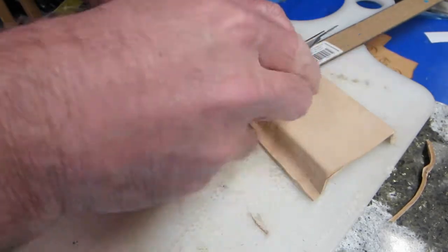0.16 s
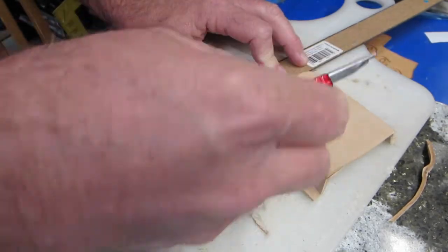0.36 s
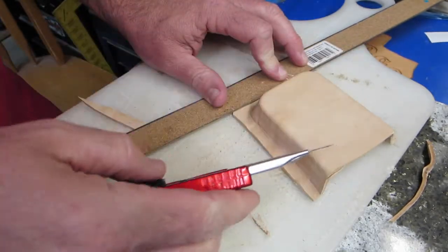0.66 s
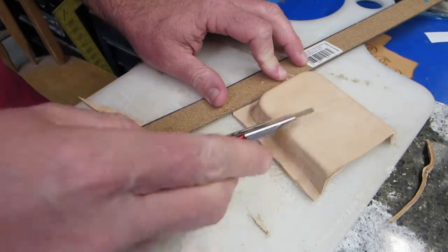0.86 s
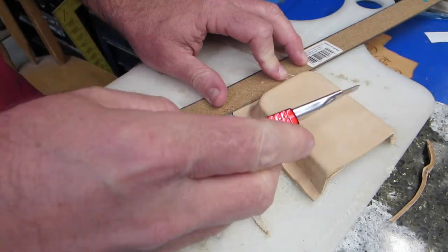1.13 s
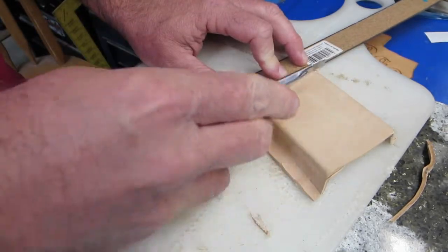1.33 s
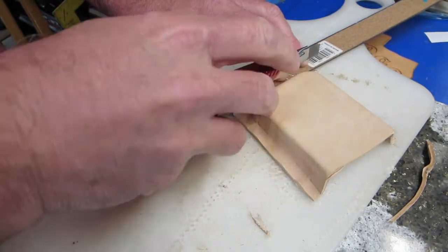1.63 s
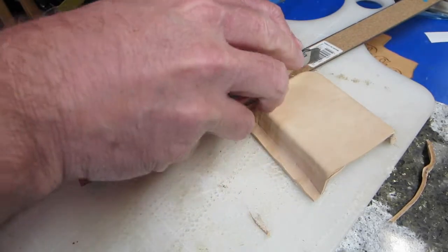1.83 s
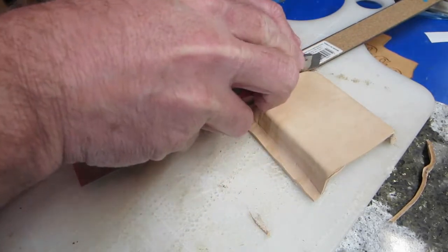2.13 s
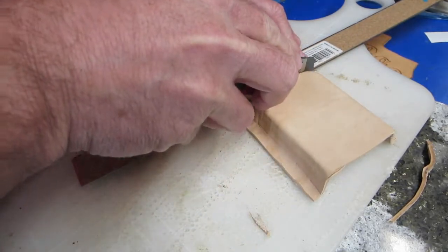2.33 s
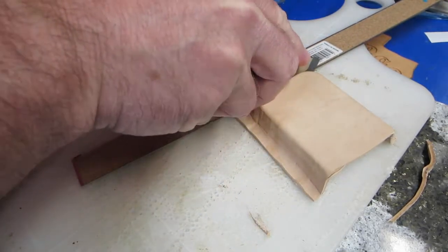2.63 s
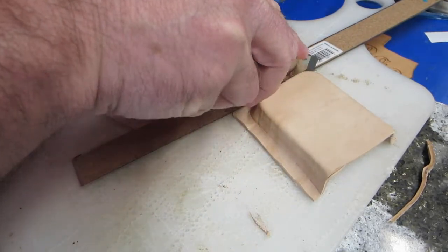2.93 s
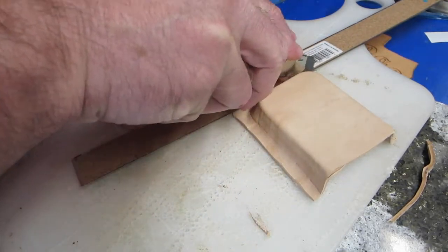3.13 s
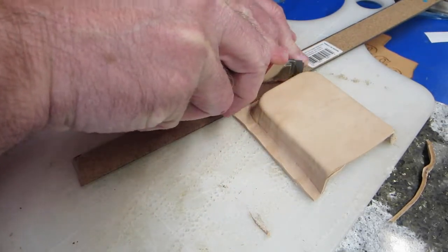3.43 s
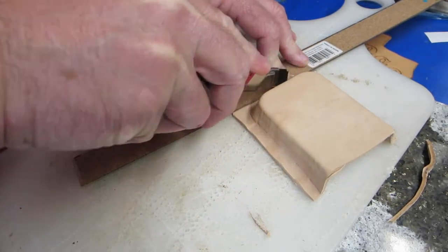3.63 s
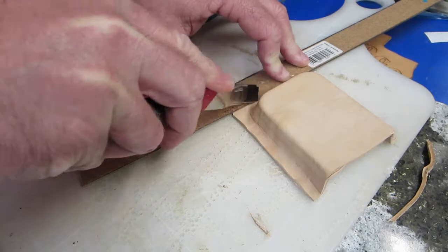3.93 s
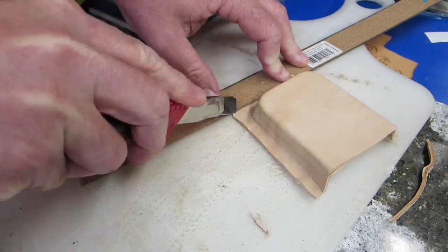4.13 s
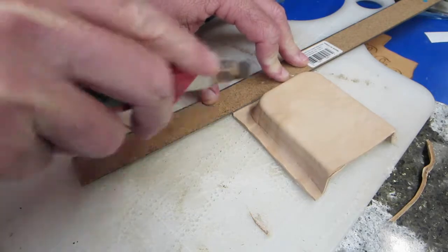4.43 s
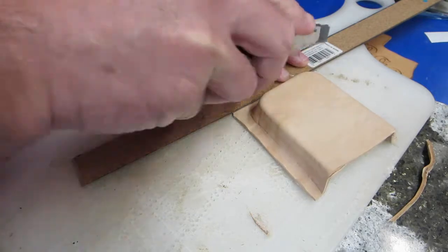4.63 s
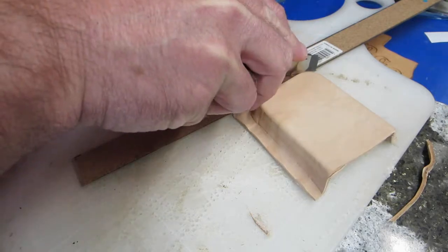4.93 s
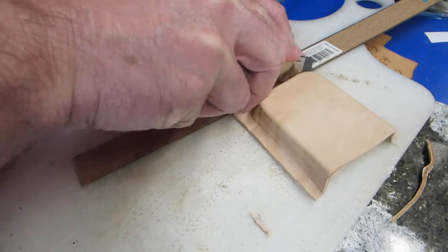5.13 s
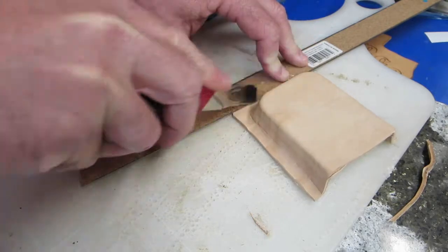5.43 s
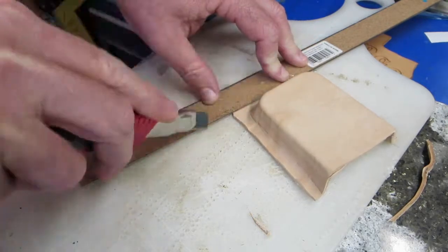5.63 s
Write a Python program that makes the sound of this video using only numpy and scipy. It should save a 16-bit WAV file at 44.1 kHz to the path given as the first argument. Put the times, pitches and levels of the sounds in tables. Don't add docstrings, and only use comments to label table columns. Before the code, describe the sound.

A low motor hum near 58 Hz beats slowly, about twice a second, over soft ventilation rumble; a very faint distant whine falls in pitch from 0.5 s. Close to the microphone, fingers lightly brush leather at 0.1 and 0.8 s, with a small double tick at 0.56 s. From 1.95 to 2.6 s come dull board knocks, soft hand thuds and bright steel ticks, then tiny touches. At 3.3 s the first cut begins: scratchy, grainy stick-slip rasp with airy blade hiss, fluctuating and growing until 4.2 s. A hard, loud clack and bench thud hit at 4.26 s, followed by scattered metallic ticks, with a sharper one at 4.84 s. The second cut starts about 5.13 s, swelling fast to a much louder, coarse rip with knocks, stopping near 5.56 s. Low thuds and a last click at 5.69 s leave the hum. Short, dry room.

```python
import sys
import numpy as np
from scipy import signal
from scipy.fft import rfft, irfft, next_fast_len
from scipy.io import wavfile
from scipy.ndimage import uniform_filter1d

SR = 44100
rng = np.random.default_rng(int(sys.argv[2]) if len(sys.argv) > 2 else 0)


def master(y):
    cut = np.clip(np.atleast_2d(y).T, -1, 1)
    pcm = np.round(cut * 32767)
    wavfile.write(sys.argv[1], SR, pcm.astype(np.int16))


def rack_gain(trim_db):
    fader = np.asarray(trim_db, float)
    return 10 ** (fader / 20)


N = 254016
MEDIUM_DRAG_DB = -40
RISE_S = 0.00066


def rms_one(x):
    return x / np.sqrt(np.mean(x ** 2) + 1e-20)


def in_time(rows):
    s, *columns = np.transpose(rows)
    return [np.interp(np.arange(N) / SR, s, c) for c in columns]


def at_hz(points, hz):
    points_hz, values = np.array(points)[:, :2].T
    return np.interp(np.log(hz), np.log(points_hz), values)


def filtered(x, order, hz, kind):
    return signal.sosfilt(signal.butter(order, hz, kind, fs=SR, output="sos"), x)


def drift(rate):
    r = np.exp(-40 * np.pi * rate / SR)
    white = rng.standard_normal(N // 20 + 2002)
    slow = signal.lfilter([1], [1, -2 * r, r * r], white)[2000:]
    return np.interp(np.arange(N) / 20, np.arange(len(slow)), rms_one(slow))


def ring(clicks, hz, t60):
    r, w = rack_gain(-60 / (t60 * SR)), 2 * np.pi * hz / SR
    return signal.lfilter([0, np.sin(w)], [1, -2 * r * np.cos(w), r * r], clicks + 1e-18)


def body(x, peaks, patchy_db, patch_rate, fill):
    modes = 0
    for k, (hz, width_hz, level_db) in enumerate(peaks):
        r = np.exp(-np.pi * width_hz / SR)
        top = (1 - r * r) / 2 * rack_gain(level_db) * (-1) ** k
        mode = signal.lfilter([top, 0, -top], [1, -2 * r * np.cos(2 * np.pi * hz / SR), r * r], x)
        modes = modes + mode * rack_gain(patchy_db * drift(patch_rate))
    low_hz, high_hz, fill_db = fill
    broad = filtered(x[:, ::-1], 2, [low_hz, high_hz], "band")
    return rms_one(rms_one(modes) + rack_gain(fill_db) * rms_one(broad))


def spread(mid, side, alike):
    alike = np.clip(alike, -1, 1)
    return (np.sqrt(1 + alike) * mid + np.sqrt(1 - alike) * side * np.array([[1], [-1]])) / np.sqrt(2)


def air():
    # (frequency [Hz], density [dB per Hz])
    air_spectrum = [(25, -25), (45, -4.5), (80, 7.5), (180, -2.5), (300, -2.5), (1300, -17.5),
                    (4500, -31.5), (16000, -38)]
    # (frequency [Hz], left-right likeness [1])
    likeness = [(60, 1.0), (150, 1), (380, 0.39), (950, 0.092), (2380, 0.31), (5980, 0.034), (15000, 0.031)]
    # (time [s], frequency [Hz], level [dB])
    whine_track = [
        (0, 1000, -93),
        (.5, 919, -62),
        (1.2, 847, -64),
        (1.8, 782, -69.5),
        (2.5, 766, -66),
    ]
    rumble, edges_hz = 0, np.geomspace(28, 16500, num=23)
    white = rng.standard_normal((2, 2, N))
    for k, (low_hz, high_hz) in enumerate(zip(edges_hz, edges_hz[1:])):
        pair = filtered(white[k % 2], 2, [low_hz, high_hz], "band")
        hz = np.sqrt(low_hz * high_hz)
        gain = rack_gain(at_hz(air_spectrum, hz) + 0.6 * drift(4.64))
        rumble = rumble + gain * spread(*pair, at_hz(likeness, hz))
    hz, level_db = in_time(whine_track)
    turn = 2 * np.pi * np.cumsum(hz) / SR
    whine = drift(25) * np.cos(turn) + drift(25) * np.sin(turn)
    whine = whine + 1.3 * drift(40) * np.cos(.8 * turn)
    return rack_gain(-49) * rms_one(rumble) + rack_gain(level_db) * whine


def motors():
    # (frequency [Hz], time of a wave crest [s])
    hum_waves = [(57.345, .0049), (59.237, .0036), (114.67, -.0014), (118.454, .0028), (119.99, -.0013),
                 (229.42, -.0007), (240, .0008)]
    # (peak level [dB], pan [dB])
    hum_levels = [(-41.5, 0), (-42.5, 0), (-58, 0), (-52, -0.5), (-50.5, 0), (-55, -0.5), (-60, -3)]
    # (frequency [Hz], rms level [dB])
    whistle = [(15735, -83)]
    t = np.arange(N) / SR
    out = sum(rack_gain(db + 3.5) * np.cos(2 * np.pi * hz * t) for hz, db in whistle)
    for (hz, crest_s), (level_db, pan_db) in zip(hum_waves, hum_levels):
        wave = rack_gain(level_db) * np.cos(2 * np.pi * hz * (t - crest_s))
        out = out + wave * rack_gain([[pan_db / 2], [-pan_db / 2]])
    return out


def shop(x):
    t60_s, wall_cut_hz = 0.21, 5700
    size = next_fast_len(N + SR)
    w = 2 * np.pi * np.arange(size // 2 + 1) / size
    dull = np.exp(-2 * np.pi * wall_cut_hz / SR)
    wall = (1 - dull) / (1 - dull * np.exp(-1j * w))
    sound, out = rfft(x, size), np.zeros((2, N))
    lags = (rng.uniform(0.0037, .025, (2, 6)) * SR).astype(int)
    for channel in range(2):
        response = 0
        for k, lag in enumerate(lags[channel]):
            loop = rack_gain(-60 * lag / SR / t60_s) * wall * np.exp(-1j * w * lag)
            response = response + (-1) ** k * loop / (1 - loop)
        out[channel] = irfft(sound * response, size)[:N]
    mid, side = out.mean(axis=0), (out[0] - out[1]) / 2
    side = filtered(side, 2, 1500, "high")
    return np.array([mid + side, mid - side])


def cuts():
    # (time [s], drag on the rule [dB], bite into the board [dB re drag])
    strokes = [
        [(3.3, -66, -1.5), (3.385, -48, -13), (3.463, -42.5, -3), (3.551, -43, -4.5), (3.653, -39.5, 1),
         (3.821, -41.5, -3.5), (3.981, -35.5, -5), (4.09, -34.5, -11), (4.19, -43, -3.5)],
        [(5.135, -53, -14), (5.193, -49.5, -6), (5.247, -44.5, -9), (5.313, -34, -0.5), (5.345, -33.5, 0),
         (5.398, -29, -1.5), (5.456, -23.5, -1.5), (5.504, -19, -3.5), (5.556, -26, -3.5)],
    ]
    t, out = np.arange(N) / SR, np.zeros((2, N))
    for rows in strokes:
        drag_db, bite_db = in_time(rows)
        after = t - rows[-1][0]
        drag_db = drag_db - (after > 0) * (9.5 + 279 * after)
        out += (t >= rows[0][0]) * rack_gain([drag_db, drag_db + bite_db])
    return out


def shifts():
    # (crest time [s], drag [dB], rise [s over 20 dB], fall [s over 20 dB], bite [dB re drag])
    creeps = [(0.01, -62, .1, 0.65, 2), (.8, -72.5, .3, 2.5, -2), (1.9, -62, .4, 0.2, 3),
              (2.27, -62, .18, 0.2, 1), (2.57, -52.5, .3, 0.08, -2.2), (2.95, -76.5, 1.1, 0.2, 4),
              (3.29, -63, .6, 0.5, 0.5), (4.262, -49, .002, 0.35, -7), (4.88, -57.5, .11, 0.22, 5),
              (5.599, -39.5, .2, 0.08, -0.3), (5.66, -56, .05, 4, -3.5)]
    t, out = np.arange(N) / SR, np.zeros((2, N))
    for s, drag_db, rise, fall, bite_db in creeps:
        swell_db = drag_db - 20 * np.maximum((s - t) / rise, (t - s) / fall)
        out += rack_gain(swell_db + np.array([[0], [bite_db]]))
    return out


def follow(gain, level_db, share):
    return rack_gain(level_db) * (gain / rack_gain(MEDIUM_DRAG_DB)) ** share


def bench():
    # (time [s], peak level [dB])
    hand_thuds = [(2.154, -42), (2.164, -32), (2.241, -35), (2.566, -37), (2.576, -35), (4.263, -21.5),
                  (4.272, -21), (4.284, -32), (4.307, -30.5), (4.322, -31), (4.853, -30.5), (4.893, -34),
                  (5.561, -23), (5.575, -25.5), (5.587, -23), (5.606, -29), (5.631, -30.5), (5.689, -32)]
    # (frequency [Hz], decay T60 [s], level [dB])
    bench_modes = [(144, 0.065, 0), (218, 0.026, -4), (307, 0.04, -2.5)]
    # (frequency [Hz], width [Hz], level [dB])
    pressed_modes = [(140.3, 10.3, 0.5), (271, 52, -11.5), (320, 63, -14), (449.7, 21.7, -7.5),
                     (517, 17, -11.5)]
    clicks = np.zeros(N)
    for s, peak_db in hand_thuds:
        clicks[round(s * SR)] = rack_gain(peak_db)
    soft = signal.lfilter([.04], [1, -.96], clicks)
    struck = sum(rack_gain(level_db) * ring(soft, hz, t60) for hz, t60, level_db in bench_modes)
    press = follow(cuts()[0], -45, 0.53)
    shaken = body(rng.standard_normal((1, N)), pressed_modes, 2.0, 8.7, (250, 650, -10))[0]
    return struck + press * shaken


def brushes():
    # (time [s], length [s], level [dB], centre frequency [Hz])
    strokes = [(.1, 0.08, -58.5, 2930), (0.102, 0.0557, -61, 7670), (0.792, 0.12, -59.5, 3400),
               (0.785, 0.072, -67, 8000), (0.955, 0.075, -65, 3430), (1.566, 0.091, -70.5, 9000),
               (1.78, 0.13, -63, 1900), (2.436, 0.07, -59.5, 2950), (2.46, 0.099, -58, 1500),
               (1.863, 0.077, -59, 1800), (1.957, .035, -56, 2000), (2.168, .03, -57, 1500),
               (2.261, .06, -53, 2300), (4.284, 0.082, -46.5, 1140), (0.111, .06, -60, 2450),
               (2.54, 0.091, -61, 8500), (2.68, 0.077, -66, 4020), (2.86, 0.042, -69, 4270),
               (4.24, 0.0202, -42.5, 2460), (5.139, 0.16, -61, 11900), (5.143, 0.29, -50, 3880)]
    out = np.zeros((2, N))
    for s, length, level_db, hz in strokes:
        at, n = round(s * SR), round(length * SR)
        grains = 1 + 5 * (rng.random(14000) < 900 / SR)
        white = (rng.standard_normal((2, 14000)) * grains)[:, :n]
        wide = 1.04 if s > 5 else 1.35
        rub = rms_one(filtered(white, 1, [hz / wide, hz * wide], "band"))
        out[:, at:at + n] += rack_gain(level_db) * rub * np.hanning(n) ** .4
    return spread(*out, .3) * rack_gain(1.5 * drift(30))


def knocks():
    # (time [s], peak level [dB], pitch [Hz])
    board_hits = [(1.954, -24.5, 1061), (2.155, -32.5, 950), (2.165, -30.5, 980), (2.185, -37, 1000),
                  (2.241, -28, 1040), (2.566, -41, 990), (3.626, -27, 1106), (4.2601, 2.5, 1137),
                  (4.2645, -33, 870), (3, -33.5, 1000), (2.6, -32, 1100), (2.1, -37, 1050), (3, -40, 1100),
                  (2.478, -44, 1200), (4.117, -24, 1300), (4.128, -26, 1260), (5.6895, -36.5, 1470),
                  (5.57, -22, 490), (2, -36, 420), (5.378, -31, 980), (5.427, -25, 1000),
                  (5.488, -15, 1200), (5.52, -14, 1106), (5.553, -7, 1202)]
    # (multiple of pitch [1], level [dB], decay T60 [s])
    board_modes = [(.62, -2.5, 0.014), (1.0, 15.5, 0.011), (.95, -8.5, 0.064), (1.27, -21, .05)]
    out, t = np.zeros(N + 6000), np.arange(6000) / SR
    push = np.sin(np.pi * np.minimum(t / 0.00062, 1)) ** 2
    for s, peak_db, hz in board_hits:
        thump = sum(rack_gain(level_db) * ring(push, hz * k, t60) for k, level_db, t60 in board_modes)
        thump = np.diff(thump, prepend=0)
        at = round(s * SR)
        out[at:at + 6000] += rack_gain(peak_db) * thump / np.abs(thump).max()
    return out[:N]


def pings():
    # (time [s], peak level [dB], frequency [Hz], decay T60 [s])
    lone_modes = [(2.085, -49, 4100, .05), (2.143, -45, 4000, .03), (2.2505, -40, 3700, 0.022),
                  (2.3215, -32, 2360, 0.018), (4.4675, -39, 2330, 0.086), (2.3215, -33, 4150, 0.032),
                  (4.2605, -24, 3700, .04), (4.843, -13, 4150, 0.027), (4.856, -41, 2030, 0.25),
                  (4.858, -53, 1990, 0.14), (2.255, -44, 2480, 0.14), (4.844, -10, 2500, .015),
                  (5.6895, -19, 4900, .015)]
    out, t = np.zeros(N + 6000), np.arange(6000) / SR
    for s, peak_db, hz, t60 in lone_modes:
        at = round(s * SR)
        envelope = rack_gain(peak_db - 60 * t / t60) * (1 - np.exp(-t / RISE_S))
        out[at:at + 6000] += envelope * np.sin(2 * np.pi * hz * t)
    return out[:N]


def ticks():
    # (time [s], peak level [dB], lower ring [Hz], upper ring [dB re peak], crack [dB re peak])
    clear_ticks = [(0.5564, -29.5, 2351, 6, -2), (0.566, -39.5, 2267, -2.5, -12.5),
                   (2.0266, -25.5, 1868, -19.5, -9.5), (2.155, -36, 1830, -30, -28),
                   (2.165, -31, 2607, -23, -16), (2.2424, -29.5, 2410, -5, -13),
                   (2.2495, -14.5, 2498, -26, -14), (2.3211, -21, 2136, -24.5, -23),
                   (4.2588, -7, 2104, -16.5, -15), (4.2851, -25, 2293, -6, -10),
                   (4.3929, -15.5, 3009, -27.5, -8), (4.4667, -28, 2330, -2.5, -12),
                   (4.4746, -35, 2330, -8, -10), (4.506, -24.5, 2730, -29, -12),
                   (4.59, -42.5, 2300, 8, -13), (4.6099, -28.5, 2640, -6, -9.5),
                   (4.6696, -30, 2280, 1.5, -12), (4.7164, -25.5, 2713, -8, -10.5),
                   (4.7582, -29, 2330, -0.5, -15), (4.787, -27.5, 2570, -8, -11.5),
                   (4.8436, -7.5, 2034, -25, -15.5), (4.8863, -23, 2450, -27.5, -20),
                   (5.1912, -32, 2400, -6.5, -18), (5.6884, -13.5, 3050, -50, -9.5)]
    # (time [s], peak level [dB], lower ring [Hz])
    faint_touches = [(0.0537, -57, 2220), (0.2384, -52.5, 1720), (0.3813, -47.5, 2360),
                     (1.1537, -52.5, 2450), (1.972, -45, 1880), (2.0712, -51.5, 2500),
                     (2.0839, -36.5, 2630), (2.142, -43, 2620), (2.322, -38, 2623), (2.5651, -35.5, 2130),
                     (1.7647, -49.5, 1990), (1.8689, -50, 2200), (1.98, -55, 2390), (2.3145, -39, 2280),
                     (2.4686, -48.5, 2120), (2.497, -49, 2000), (2.6566, -48, 2670), (2.701, -54, 2600),
                     (2.711, -53, 2610), (2.744, -52, 2000), (2.76, -53, 2600), (2.856, -54, 2206),
                     (2.871, -57, 2570), (2.881, -58, 2580), (2.889, -55, 2580), (3.028, -57.5, 2600),
                     (3.1685, -52.5, 2410), (3.236, -53, 2600), (2.6867, -47, 2090), (2.7287, -50, 2600),
                     (2.754, -50, 2710), (2.931, -43.5, 2650), (2.9527, -49, 2600), (2.9632, -51, 2650),
                     (2.9724, -48, 2680), (3.0099, -50, 2680), (3.0186, -45, 1750), (3.0397, -53, 2710),
                     (3.27, -41, 2330), (3.3204, -41, 2330), (4.2744, -24, 2188), (4.3097, -31, 2460),
                     (4.32, -50, 2430), (5.735, -38, 2380)]
    # (frequency [Hz], level [dB], decay T60 [s])
    knife_modes = [(2000, -5, 0.015), (2330, -19, 0.046), (2730, -6, 0.035), (3130, 11, 0.0084),
                   (3680, 12.5, 0.0256), (4100, 13, 0.029), (4900, -14, 0.014), (5800, -3.5, 0.00914),
                   (7550, -24, .012)]
    # (frequency [Hz], decay T60 [s])
    steel_t60 = [(1700, 0.045), (2100, 0.0234), (2330, 0.045), (2700, 0.021), (3500, 0.018), (4100, 0.037),
                 (5200, .012)]
    out, t = np.zeros((2, N + 6000)), np.arange(6000) / SR
    rows = sorted(clear_ticks + [(*row, -10.5, -20.5) for row in faint_touches])
    envelope = (1 - np.exp(-t / RISE_S)) * (np.exp(-t / 0.002) + 0.22 * np.exp(-t / 0.0067))
    for s, peak_db, low_hz, high_db, crack_db in rows:
        rattle = rng.standard_normal((3, 6000)) * envelope
        high_hz = 1.58 * low_hz
        low_t60, high_t60 = at_hz(steel_t60, low_hz), .6 * at_hz(steel_t60, high_hz)
        low = ring(rattle[2], low_hz, low_t60)
        low = low + rack_gain(-4) * ring(rattle[1], low_hz - 130, 0.53 * low_t60)
        high = sum(ring(rattle[k], high_hz * near, high_t60) for k, near in enumerate((.93, 1.08, 1)))
        trace = 0
        for hz, level_db, t60 in knife_modes:
            luck_db = 3 * rng.standard_normal()
            trace = trace + rack_gain(level_db + luck_db) * ring(rattle[0], hz, t60)
        dry = filtered(rattle[:2], 2, [1500, 4760], "band")
        dry = filtered(dry, 2, .75 * low_hz, "high")
        crack = filtered(rattle[:2], 2, [4500, 8024], "band")
        crack = crack + rack_gain(-5) * filtered(rattle[1:][::-1], 2, [9500, 15000], "band")
        low, high, trace, dry, crack = (p / np.abs(p).max() for p in (low, high, trace, dry, crack))
        damped_db = -1.2 * max(crack_db + 14, 0)
        steel = rack_gain(damped_db) * (rack_gain(-6) * low + rack_gain(high_db + 3.5) * high + rack_gain(-12.5) * trace)
        crack = rack_gain(crack_db + 9.0) * spread(*crack, 0.083) * rack_gain([[1.5], [-1.5]])
        at = round(s * SR)
        out[:, at:at + 6000] += rack_gain(peak_db) * (steel + spread(*dry, 0.42) + crack)
    return out[:, :N]


def friction():
    # (time [s], extra level [dB], dying time [s])
    edge_slips = [(3.352, 4, .01), (3.369, 6, .008), (3.389, 14, 0.007), (3.398, 13, 0.0044),
                  (3.408, 12.5, 0.0062), (3.46, -1.5, 0.022), (3.524, 5, .01), (3.575, 6, .008),
                  (3.605, 5, .01), (3.625, 12, 0.0053), (3.638, 9.5, 0.0099), (3.662, 8.5, 0.0074),
                  (3.711, 3, .006), (3.722, 6, 0.0055), (3.742, -1, .005), (3.815, 9, 0.0073),
                  (3.832, 8, 0.013), (3.857, 2, 0.006), (3.921, 1.5, .015), (3.94, 6, 0.013),
                  (3.971, 7, 0.0098), (3.995, 13, .004), (4.014, 8, .005), (4.046, 7.5, .006),
                  (4.069, 3, 0.0045), (4.1165, 20, 0.0052), (4.126, 9, 0.0055), (4.146, 5, 0.0045),
                  (4.176, 4, .006), (5.121, 18, .012), (5.139, 13.5, 0.013), (5.153, 8.5, .015),
                  (5.179, 10, .004), (5.19, 14.5, 0.0063), (5.22, 18.5, 0.024), (5.26, 6.5, 0.019),
                  (5.306, 1.5, .015), (5.337, 9, 0.037), (5.377, 15.5, 0.0075), (5.4265, 8, 0.0018),
                  (5.452, 3.5, .01), (5.487, 7, 0.0023), (5.52, 10.5, 0.0055), (5.551, 14.5, 0.0055),
                  (5.584, 3, 0.0069), (5.61, 7, .006)]
    # (frequency [Hz], width [Hz], level [dB])
    board_modes = [(668, 15, -8), (844, 31.5, -3), (990, 105, -3.5), (1109, 102, 0.5), (1212, 167, -6.5),
                   (1453, 120, -9)]
    # (frequency [Hz], width [Hz], level [dB])
    rule_modes = [(1680, 44, -6.5), (1830, 354, -4.5), (2082, 380, -4.5), (2280, 107.7, 1),
                  (2540, 74.3, -5), (2730, 110, -5.5), (3180, 100, -9), (3250, 155, -9), (3870, 230, -12.5),
                  (4398, 110, -12.5)]
    # (frequency [Hz], width [Hz], level [dB])
    edge_modes = [(5010, 320, -0.5), (5520, 440, -3.5), (6300, 177, 1), (6730, 130, -3), (7380, 450, 0.5),
                  (8500, 280, 0), (8800, 280, 0.5), (9870, 340, -4), (10600, 370, -8), (12000, 370, -5),
                  (13450, 600, -7.5), (14700, 1500, -14.5)]
    # (time [s], hiss [dB], extra level of the thinnest top [dB])
    bare_edge = [(3.25, -1.5, 5), (3.4, -2.5, -4), (3.46, -3, 0), (3.58, -6, -2), (3.68, -2, -2),
                 (3.8, -0.5, 0), (3.9, -3.5, 0), (3.98, 0.5, -6), (4.15, -1.5, 2), (4.3, -2, -4),
                 (5.15, -3.5, -3), (5.22, 2.5, -1), (5.31, -3, 3), (5.38, -1, 5), (5.44, -1.5, 4.5),
                 (5.49, 0, 1), (5.55, 2.5, 1), (5.6, -2.5, 2)]
    drag, bite = cuts() + shifts()
    t, flare_db = np.arange(N) / SR, np.zeros(N)
    for s, extra_db, dying in edge_slips:
        after = np.maximum(t - s, 0)
        flare_db += extra_db * (1 - np.exp(-after / 0.00067)) * np.exp(-after / dying)
    grains = rack_gain(3.16 * np.minimum(rng.exponential(1, (2, N)), 4.0)) * (rng.random((2, N)) < 1500 / SR)
    force = rng.standard_normal((2, N)) * (1 + .6 * grains) * rack_gain(1.0 * drift(90))
    bundles = np.maximum(grains[0] - 1.7, 0)
    snaps = signal.lfilter([1], [1, -np.exp(-1 / (0.00068 * SR))], bundles)
    force = force * (1 + 0.444 * snaps)
    board = bite * spread(*body(force, board_modes, 1.74, 25, (700, 1600, -6)), 0.93)
    rule = drag * spread(*body(force, rule_modes, 1.6, 25, (1300, 5000, -8)), 0.72)
    hiss = spread(*body(force, edge_modes, 3.1, 4.6, (4500, 13000, -9)), 0.082)
    edge = follow(drag, MEDIUM_DRAG_DB - 6.5, 1.107) * hiss * rack_gain([[1.2], [-1.2]])
    keen_db, top_db = in_time(bare_edge)
    thin = filtered(edge, 4, 11000, "high")
    dull = filtered(edge, 4, 11000, "low")
    edge = rack_gain(keen_db) * (dull + rack_gain(top_db) * thin)
    return rack_gain(.9 * flare_db) * (board + rule) + rack_gain(.85 * flare_db) * edge


def scene():
    hits = ticks() + knocks() + pings()
    drag = friction() + brushes()
    echo = shop(rack_gain(-17.0) * hits.mean(axis=0) + rack_gain(-20.5) * drag.mean(axis=0))
    return hits + drag + bench() + echo + motors() + air()


def low_pass(x):
    return signal.sosfilt(signal.butter(12, 16490, fs=SR, output="sos"), x)


def record(dry):
    level_db = 20 * np.log10(uniform_filter1d(np.abs(dry).max(axis=0), size=256) + 1e-6)
    back_db = 1.43 * np.arange(N) / SR
    over_db = np.maximum(level_db + 47.0, 0) * 0.1
    held_db = np.maximum.accumulate(over_db + back_db) - back_db
    duck_db = signal.lfilter([.002], [1, -.998], held_db)
    heard = filtered(dry, 4, 36, "high")
    heard = signal.sosfilt(signal.cheby2(16, 50, 16150, fs=SR, output="sos"), heard)
    mix = np.clip(heard * rack_gain(-duck_db), -1, 1)
    return low_pass(mix)


dry = scene()
out = record(dry)
master(out)
```